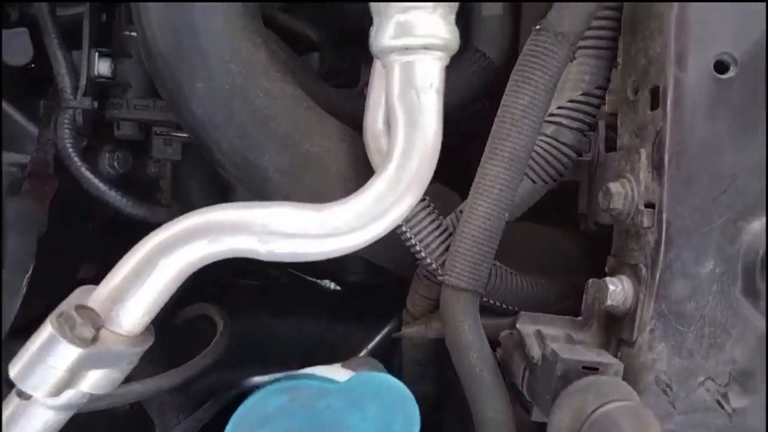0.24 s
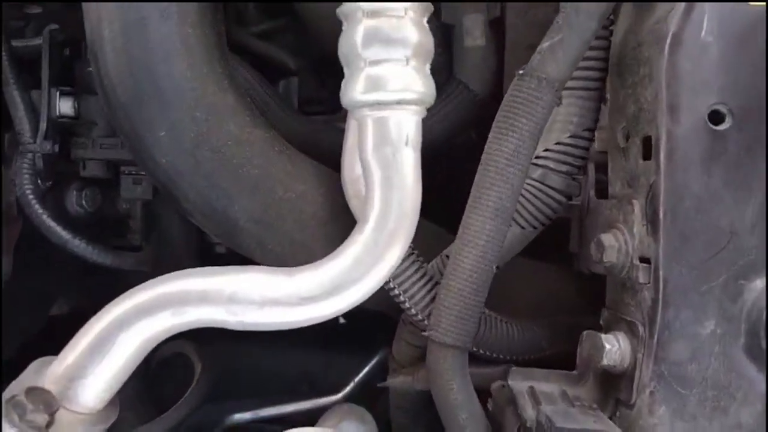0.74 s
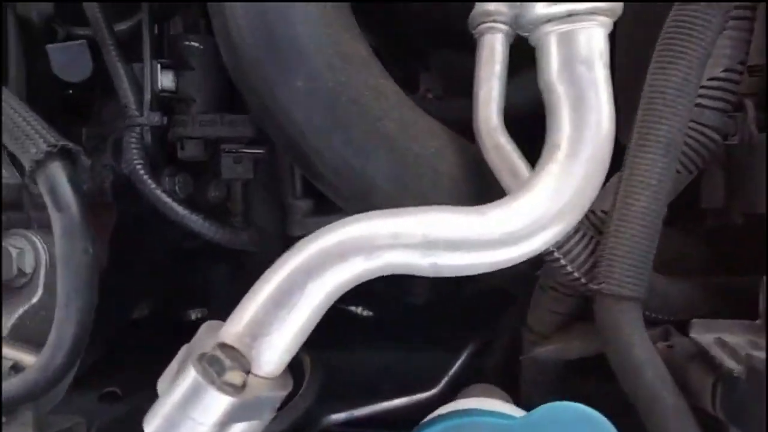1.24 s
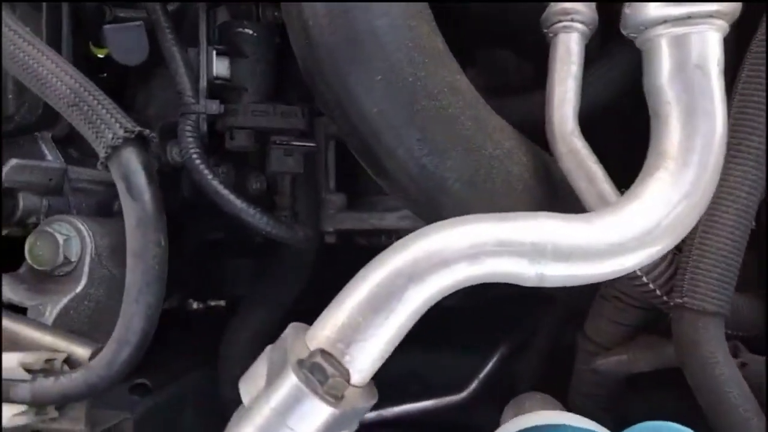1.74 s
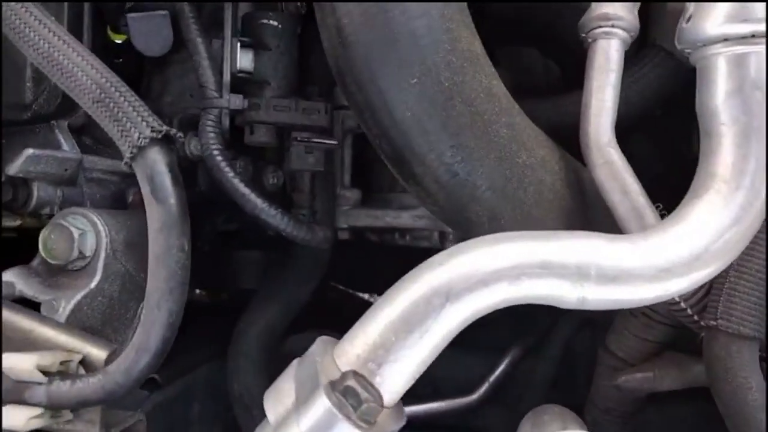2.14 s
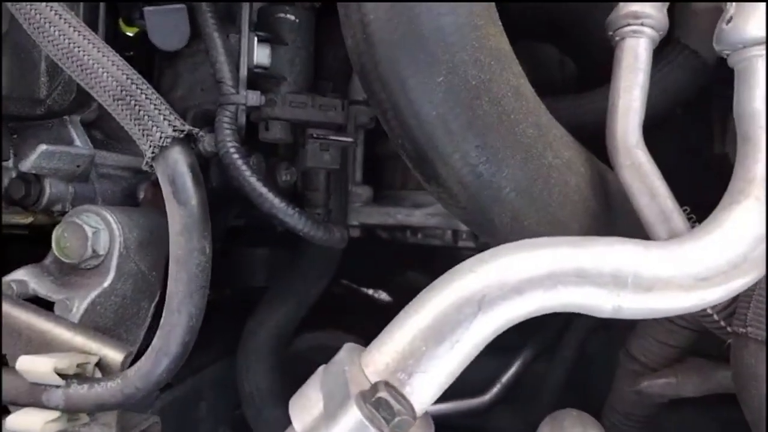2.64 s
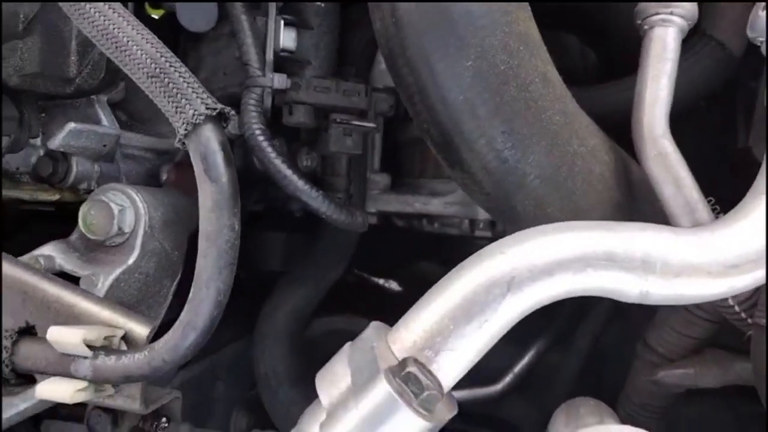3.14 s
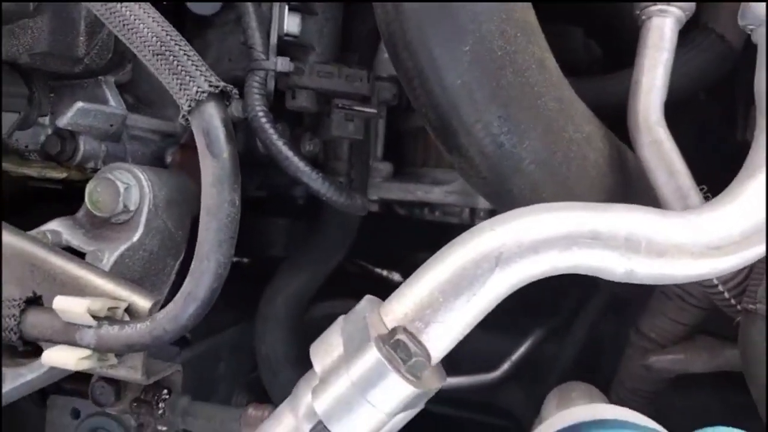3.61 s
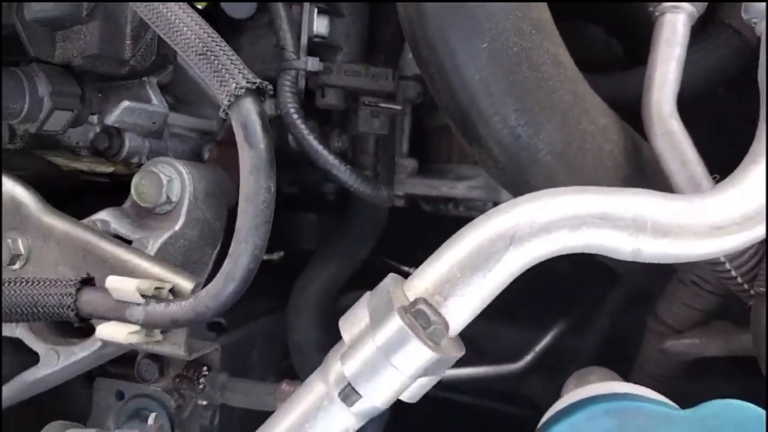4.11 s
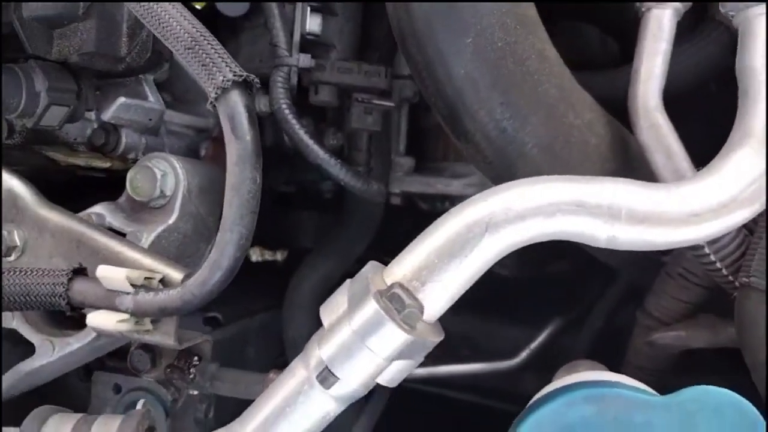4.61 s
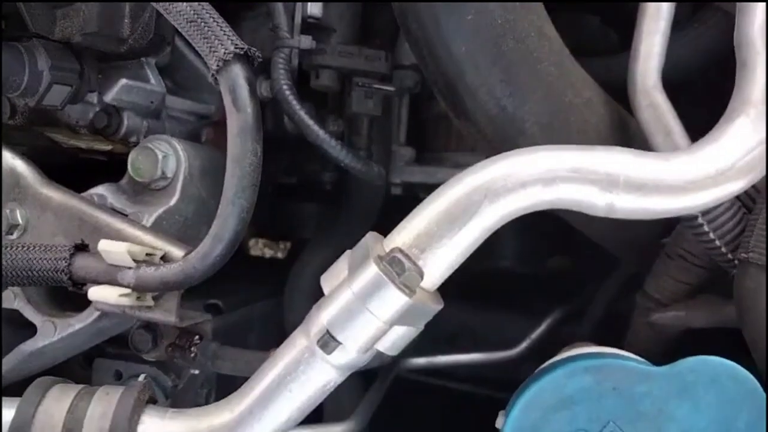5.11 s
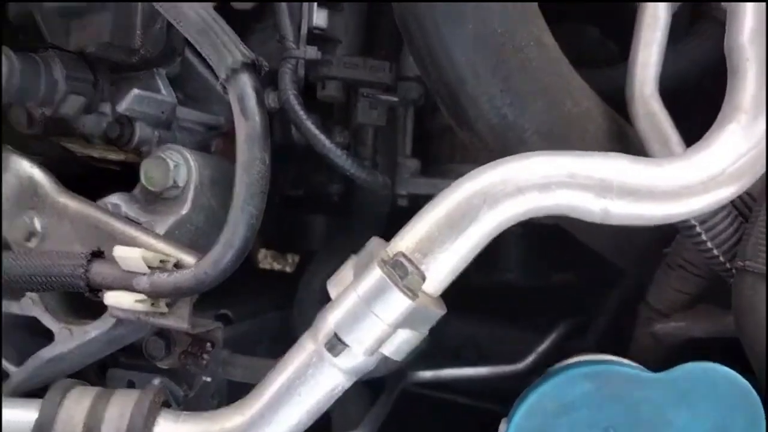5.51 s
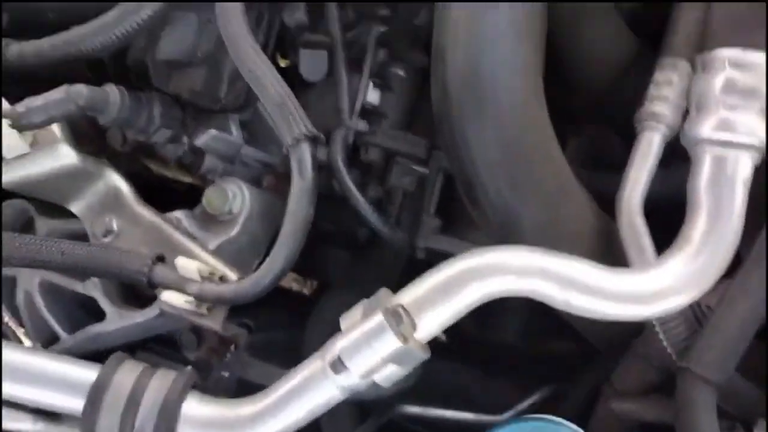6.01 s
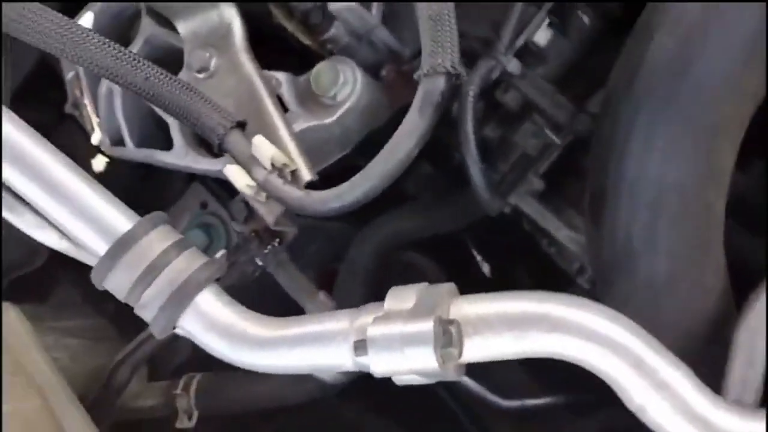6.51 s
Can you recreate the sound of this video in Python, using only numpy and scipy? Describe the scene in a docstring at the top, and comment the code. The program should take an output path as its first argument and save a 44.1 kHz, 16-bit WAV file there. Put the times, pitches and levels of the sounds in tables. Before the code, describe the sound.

From 0 to about 6.75 seconds, a four-cylinder diesel idles without changing speed, about 28 firings a second: low throb, dull metallic knocks, injector ticks and dry rattling in a pattern repeating seven times a second. Air noise, faint whine and steady belt hiss surround it. Louder on top, a slipping belt squeals from the start in rough chirps around 5 to 6 kHz, mostly around a hundredth of a second long, bright and scraping, clustering irregularly. A piercing whistle near 14.5 kHz warbles above, weaker around 0.7, stronger from 1.5, with flares near 2.6, 2.8, 4.1 and 5.7, strongest at 5.8. Brief dips in level come throughout, deeper near 3.1, 5.4 and 5.7. From about 4 a low hum near 50 Hz creeps in, growing strongest at the end and beating with the throb. The close moving microphone catches only tight, very short reflections; the sound stops mid-idle.

```python
"""An open engine bay, heard from close above: a four-cylinder diesel idles with firing throb, knocks and injector ticks.
Throb is a harmonic series; blows ring resonances and shake loose parts; moving air and belt rub are coloured noise.
The drive belt slips on a worn pulley: a very high friction whistle warbles with belt tension and flares up, and
short lower chirps break out where a slick stretch of belt meets a tug of the crank. Nearby panels reflect the squeal;
later a low sine hum joins and beats with the throb's second harmonic. Now and then the level dips."""
import sys
import numpy as np
from scipy import signal
from scipy.fft import rfft, irfft, next_fast_len
from scipy.io import wavfile
from scipy.ndimage import map_coordinates

SR = 44100
rng = np.random.default_rng(int(sys.argv[2]) if len(sys.argv) > 2 else 0)


def int16_out(signal):
    """Quantize to a 16-bit WAV file."""
    q = np.round(np.clip(np.atleast_2d(signal).T, -1, 1) * 32767)
    wavfile.write(sys.argv[1], SR, q.astype(np.int16))


N = 297675

CYCLE_HZ, CYCLE_START_S = 7.07926, .0086  # one cycle is two crank turns and four firings
BELT_HZ = 4.145  # belt laps a second
PULLEY_HZ, PULLEY_START_S = 65.52, .0023  # pulley turns a second; first tight moment
TOP_HZ = 15800  # nothing is heard above this
WHINE_RISE_DB = 2.5  # growth of the whine from first to last moment as the microphone nears the engine
WHISTLE_HZ, CHIRP_HZ = 14470, 5500  # the two friction tones before any shift
SLIP_DB, SLIP_TOP_DB = -40.5, -22.5  # an ordinary slip at mean grip, and where it saturates; before the chirp gain
CATCH_S, LET_GO_S = 0.001677, 0.002186  # a distinct slip catches at once and lets go a little more slowly
FADE_DB_PER_S = 68  # a distinct slip weakens while it lasts
SAG_SLIP_DB, SAG_HZ = -18, 400  # a slip of this strength makes the whistle sag by this much
CHOKE_DB_PER_HZ = .007  # a tighter belt whistles higher and more faintly; per Hz of tension shift
FLARE_S, FLARE_DB = 0.0024, -12  # time to the crest of a flare; gain on its listed level
DIP_FALL_S, DIP_RECOVER_S = 0.013, 0.04  # how fast a dip in level sets in and passes

# Coarse air and part noise. Each row: frequency in Hz, relative density in dB per Hz.
WASH_SPECTRUM = [(12, -3), (22, -20), (65, -2.5), (100, -8), (200, -9.5), (380, -15), (540, -9.5),
                 (720, -9.5), (980, -13), (2050, -16), (2250, -19.5), (2600, -18.5), (3400, -17),
                 (4400, -24), (7000, -55)]
# Late low hum. Each row: time in seconds, frequency in Hz, rms level in dB before the final colour and dips.
HUM_COURSE = [(3.8, 50.8, -80), (4.2, 51, -62), (4.6, 50.23, -56), (5.3, 49, -49), (6, 48.5, -47),
              (6.75, 46.3, -34.5)]
# Steady tones of gears and accessories. Each row: frequency in Hz, rms level in dB before its slow rise and waver.
WHINE_TONES = [(297.5, -67), (311.5, -60), (622.7, -51), (686.8, -57), (877.8, -49), (906, -52.5)]
# Exhaust and block throb. Each row: multiple of the firing rate, relative level in dB.
THROB_HARMONICS = [(1, -1.5), (2, 4), (3, -7), (4, -11), (5, -8), (6, -15.5), (7, -18.5), (8, -19.5)]
# Blows in every engine cycle. Each row: fraction of the cycle, then relative levels in dB of
# block knock, injector tick and rattle.
CYCLE_BLOWS = [(.035, -16, -1, 5), (.091, -4, -8, -2.5), (.18, -2, -26, -6), (.299, 1, 4.5, 7),
               (.332, 4.5, -4, -18), (0.406, -5, -25, 2), (0.546, -14, -1.5, 4.5), (0.607, -15, -13, 0.5),
               (.708, -1, -37, 1.5), (.792, -26, 2, 5), (.825, -3, 2.5, -5), (.912, -6.5, -6, -12)]
# Ringing of the block. Each row: frequency in Hz, width in Hz, relative level in dB.
BLOCK_MODES = [(534, 22, 3.5), (666, 23, -20), (675, 21, 10.5), (727, 13, 3), (880, 46, -10)]
# Ringing of the injectors. Each row: frequency in Hz, width in Hz, relative level in dB.
INJECTOR_MODES = [(1458, 87, 1), (1643, 51, 8.7), (2037, 89, 7.2)]
# The casing passes the middle range of the block, and the injectors above it.
# Each row: frequency in Hz, relative gain in dB.
BLOCK_CASING = [(250, -27), (520, 8.0), (900, 4.5), (1500, -13)]
INJECTOR_CASING = [(900, -29), (1400, 10.5), (2100, 6.0), (2300, -22)]
# Loose parts shaken by the blows. Each row: frequency in Hz, relative density in dB per Hz.
RATTLE_SPECTRUM = [(150, -28), (300, -2), (420, -14), (680, 3), (800, 1.5), (1000, -2.5), (1130, 3.5),
                   (1250, -10), (1700, 3.5), (2080, -15), (2220, -9.5), (2600, -12.5), (3400, -3),
                   (4300, -6.5), (6000, -35)]
# Loudness of the running engine as the microphone moves. Each row: time in seconds, gain in dB.
ENGINE_LEVEL = [(0, -35), (1, -35), (2.2, -34.5), (3.4, -34), (5, -34.3), (6.75, -35)]
# Rubbing of the belt over the pulleys. Each row: frequency in Hz, relative density in dB per Hz.
HISS_SPECTRUM = [(3000, -35), (4300, -7.5), (5500, -6), (6500, -4), (7400, 5), (8200, 3.5), (8800, 3.5),
                 (9250, 4), (10000, -4.5), (12500, -6), (13700, 1), (15400, 1), (15700, -35)]
# Uneven grip over one lap of the belt. Each row: fraction of a lap, tension shift in Hz (before the
# whistle scales it), slip change in dB, chirp shift in Hz.
BELT_GRIP = [(0.04, 380.0, -26, 230.5), (0.11, -1, -1.5, -190.0), (0.17, 40.5, 6, 130.5),
             (0.21, -270.0, 10.5, -130.0), (0.27, -330.0, 12, 159), (0.34, -130.0, 8, -150.0),
             (0.43, 170.5, 12.5, 10.0), (0.49, 421, -9.5, 249.5), (0.54, 261, -2.5, 80.0),
             (0.59, -460.0, 15.5, -50.5), (0.66, -80.0, -39, 160.0), (0.71, 80.0, 8, -250.0),
             (0.75, -220.0, 5.5, -500.0), (0.81, 350.5, -2.5, 91.5), (0.86, 120.0, 6.5, 59.5),
             (0.95, -320.0, -2.5, 98.5)]
# Pull of the crank over one turn, two firings. Each row: fraction of a turn, tension shift in Hz (before
# the whistle scales it), slip change in dB, chirp shift in Hz.
CRANK_PULL = [(0.0, 298, 6.5, 381), (0.15, 229.5, -0.5, 122.5), (0.3, -210.0, -24, 38.5),
              (0.38, -90.0, -9.5, -150.0), (0.47, -110.0, 22.5, 0.0), (0.57, 62, 5, -39.5),
              (0.68, -68.5, 3, -190.0), (0.76, -250.0, -8.5, -170.0), (0.87, 128.5, -14, -0.5)]
# Swing of a pulley running out of true: tension shift in Hz (before scaling), slip in dB, chirp in Hz.
PULLEY_RUNOUT = (140, -6.5, 37.4)
# Single distinct slips of the belt, strong or unusual in pitch. Each row: start in seconds, level in dB before
# the chirp gain, mean pitch in Hz before its jitter, length in seconds, level of the upper partials in dB
# before their own gains.
DISTINCT_SLIPS = [(0.178, -19.5, 4900, 0.009, 1), (0.321, -23, 5200.0, 0.01585, -2.5),
                  (0.407, -23.5, 5030.0, 0.0072, -7), (0.465, -22.5, 5400, 0.00795, 1.5),
                  (0.54, -19.5, 5340, 0.0084, -4), (0.619, -23, 5050, 0.00808, -7),
                  (0.788, -20, 5660, 0.0081, -2.5), (0.816, -19, 5440, 0.01725, -2),
                  (0.862, -22.5, 5390, 0.00698, 2), (0.894, -20, 5240, 0.009, -2.5),
                  (1.028, -19, 5710, 0.00973, -5), (1.061, -21, 5700, 0.0081, -4),
                  (1.29, -23, 5110, 0.00717, -1), (1.303, -20.5, 5350, 0.0138, -2),
                  (1.347, -22, 6110, 0.00695, -12), (1.379, -19, 4980, 0.01093, 2.5),
                  (1.528, -23, 5290.0, 0.0141, 1), (1.748, -18.5, 5150, 0.0069, 0),
                  (1.872, -23, 5070, 0.0073, 3.5), (2.02, -17.5, 5370, 0.01526, -2),
                  (2.098, -22.5, 4930, 0.00873, -3.5), (2.264, -20.5, 5920, 0.00774, -1),
                  (2.478, -22.5, 5990, 0.00994, -11), (2.51, -19.5, 5310.0, 0.0119, 3),
                  (2.547, -21.5, 5960.0, 0.00803, -5), (2.586, -20.5, 4990.0, 0.0129, 1.5),
                  (2.615, -20.5, 5800, 0.009, -8), (2.721, -21, 5290, 0.0224, -0.5),
                  (2.752, -24, 5780.0, 0.00796, 5.5), (2.791, -23, 5800, 0.01, 1),
                  (2.938, -20.5, 5410, 0.012, 0.5), (3.071, -21, 5040, 0.0088, 6),
                  (3.229, -21, 5280, 0.0096, -1.5), (3.301, -29, 4950, 0.0116, 1.5),
                  (3.578, -20.5, 5550, 0.0078, -5), (3.712, -21.5, 5530, 0.015, 2.5),
                  (3.761, -22.5, 5720, 0.0061, 1), (3.792, -21.5, 4710, 0.0087, -4),
                  (3.85, -17.5, 5770, 0.0063, -4.5), (3.921, -21.5, 5690, 0.01297, 0.5),
                  (3.958, -16.5, 5820, 0.006, -5), (4.065, -19.5, 5490, 0.01026, -1),
                  (4.144, -21.5, 5440, 0.0094, -6), (4.206, -17, 5540.0, 0.0076, 0.5),
                  (4.281, -19, 5070, 0.009, -1), (4.418, -17.5, 5460.0, 0.0088, -3.5),
                  (4.523, -21.5, 5540, 0.009, 0), (4.63, -20, 5405, 0.0131, 0),
                  (4.768, -20, 5490.0, 0.0078, -1), (4.92, -18, 5340, 0.0121, -4.5),
                  (4.995, -24, 5150, 0.0081, -3.5), (5.055, -24.5, 6070, 0.00697, -2),
                  (5.12, -19.5, 5610, 0.0181, -3.5), (5.195, -19.5, 5480, 0.016, -5),
                  (5.27, -18, 5510, 0.0111, -7), (5.334, -23.5, 5310, 0.0103, -1.5),
                  (5.369, -23.5, 5880, 0.0056, -2), (5.407, -15.5, 5540, 0.00685, -2),
                  (5.475, -21.5, 5170, 0.0157, -1), (5.624, -22, 5070, 0.0111, -2),
                  (5.653, -20.5, 6000, 0.006, -6), (5.971, -20, 5420.0, 0.01026, -2),
                  (6.11, -20, 5390, 0.0091, -1), (6.325, -19, 5540, 0.0173, -4.5),
                  (6.536, -25, 5210, 0.0079, 4), (6.572, -25, 5820, 0.0093, 3.5),
                  (6.613, -18, 5470.0, 0.009, 0), (6.674, -20.5, 5100, 0.0146, -2.5)]
# Loudness of the belt whistle. Each row: time in seconds, relative level in dB.
WHISTLE_LEVEL = [(0, -23.5), (0.7, -29), (1.1, -26), (1.55, -21), (2.1, -20.5), (2.9, -21.5), (3.3, -21.5),
                 (4.3, -21), (4.7, -22.2), (5.3, -24.5), (5.85, -15), (6, -25.5), (6.45, -23.5),
                 (6.75, -27.1)]
# Moments when the whistle flares up. Each row: start in seconds, level in dB before the flare gain.
WHISTLE_FLARES = [(0.4489, -13), (1.2261, -11), (1.5803, -12), (2.144, -13), (2.6364, -8), (2.7821, -5),
                  (2.9208, -12), (3.0275, -10), (3.2725, -14), (3.9818, -14), (4.122, -5), (4.4763, -15),
                  (5.5315, -23), (5.669, -8.5), (5.7876, 3), (6.1724, -12)]
# Scraping of the belt during a slip. Each row: frequency in Hz, relative density in dB per Hz.
SCRAPE_SPECTRUM = [(3000, -21.5), (4500, -8), (6500, -0.5), (8000, 1), (10000, 3), (12500, 0), (14000, -2),
                   (15500, -8)]
# Colour of the squeal on its way out of the bay. Each row: frequency in Hz, gain in dB.
SQUEAL_COLOUR = [(4000, 6), (4750, 3), (5400, 0), (5700, -0.5), (6100, 4.5), (6700, 1.5), (7600, 5.5),
                 (8800, -2.5), (9250, 3), (9700, 4), (10300, 2), (12400, -5), (13400, -1.5), (15400, 9),
                 (15650, -20)]
# Change of colour from first to last moment, as the microphone moves toward the engine.
# Each row: frequency in Hz, change in dB.
APPROACH_COLOUR = [(70.0, 0.5), (340.0, 0.5), (580.0, 0.9), (950.0, 0), (1490.0, 1), (2150.0, 0),
                   (3080.0, 0), (5630.0, 0.8), (7360.0, -1.3), (9060.0, 2.5), (11400.0, -1)]
# Brief dips of the whole level. Each row: start of the hold in seconds, depth in dB, hold in seconds.
LEVEL_DIPS = [(0.21, -3.2, 0.029), (0.478, -1.5, 0.063), (1.112, -2.5, 0.05), (1.386, -4.5, 0.063),
              (1.751, -5, 0.065), (2.16, -3.5, 0.094), (2.308, -3, 0.063), (2.512, -2.4, 0.12),
              (2.95, -3, 0.051), (3.074, -5.5, 0.063), (3.454, -3, 0.071), (3.831, -2.5, 0.1),
              (4.199, -3, 0.12), (4.64, -2, 0.1), (5.141, -1.5, 0.066), (5.408, -5.0, 0.066),
              (5.696, -6.5, 0.076), (5.813, -2.5, 0.15), (6.328, -2, 0.089), (6.618, -2.5, 0.12)]


def amp(db):
    """Level to amplitude: twenty decibels are a factor of ten."""
    return 10 ** (np.asarray(db) / 20)


def unit(x):
    """Normalisation to an rms of 1."""
    return x / np.sqrt(np.mean(x ** 2) + 1e-20)


def clock():
    """Time of every sample in seconds."""
    return np.arange(N) / SR


def cycles():
    """Phase of the engine, in cycles."""
    return CYCLE_HZ * (clock() - CYCLE_START_S)


def curves(rows):
    """Linear interpolation in time of each column after the first."""
    s, *columns = np.transpose(rows)
    return [np.interp(clock(), s, column) for column in columns]


def around(rows, turns):
    """Periodic interpolation: a rotating part repeats its table once a turn."""
    place, *columns = np.transpose(rows)
    return [np.interp(turns, place, column, period=1) for column in columns]


def wobble(rate):
    """Smooth random modulation: a spline through normal deviates, rate knots a second."""
    knots = rng.standard_normal(int(N * rate / SR) + 4)
    return map_coordinates(knots, [clock() * rate])


def filtered(x, response):
    """Linear filtering: the spectrum is multiplied by a response of frequency."""
    m = next_fast_len(N + SR // 2)
    return irfft(rfft(x, m) * response(np.fft.rfftfreq(m, 1 / SR)), m)[:N]


def coloured(x, points):
    """Spectral shaping, with gain in dB interpolated over log frequency."""
    f, db = np.transpose(points)
    return filtered(x, lambda hz: amp(np.interp(np.log(hz + 1), np.log(f), db)))


def resonate(x, modes):
    """Modal superposition: each mode is a damped second-order resonance."""
    def response(f):
        return sum(amp(db) * 1j * f * width / (centre ** 2 - f * f + 1j * f * width)
                   for centre, width, db in modes)
    return filtered(x, response)


def wash():
    """Broadband noise of moving air and parts: white noise shaped by a spectrum."""
    return unit(coloured(rng.standard_normal(N), WASH_SPECTRUM))


def hum():
    """Interference: a low sine just under twice the firing rate beats with the throb's second harmonic."""
    hz, db = curves(HUM_COURSE)
    return np.sqrt(2) * amp(db) * np.sin(2 * np.pi * np.cumsum(hz) / SR)


def whine():
    """Steady rotation radiates pure tones, here wavering slightly in level and phase."""
    total = np.zeros(N)
    for hz, db in WHINE_TONES:
        tone = np.sin(2 * np.pi * hz * clock() + 0.19 * wobble(3.01))
        total += np.sqrt(2) * amp(db + wobble(3)) * tone
    return amp(WHINE_RISE_DB * np.linspace(-.5, .5, N)) * total


def throb():
    """Fourier synthesis: harmonics of the firing rate form one low pressure dip per firing."""
    firing = 4 * cycles() - .73
    pulse = -sum(amp(db) * np.cos(2 * np.pi * k * firing) for k, db in THROB_HARMONICS)
    return unit(pulse) * amp(.8 * wobble(8))


def blows(level_db, scatter_db, jitter_s):
    """Periodic impulsive excitation at fixed crank angles, never quite alike in size and timing."""
    count = int(CYCLE_HZ * N / SR) + 1
    fraction = np.transpose(CYCLE_BLOWS)[0]
    when = (np.arange(count)[:, None] + fraction) / CYCLE_HZ + CYCLE_START_S
    when = when + jitter_s * rng.standard_normal(when.shape)
    size = amp(level_db + scatter_db * rng.standard_normal(when.shape))
    samples = np.abs(when.ravel() * SR).astype(int)
    return np.bincount(samples, size.ravel(), N)[:N]


def rattling(hits, spread_s, alike):
    """Contact noise: blows briefly shake loose parts, a share of whose contacts recurs every cycle."""
    t = np.linspace(-1 / 20, 1 / 20, SR // 10)
    shake = np.exp(-((t - spread_s / 2) / spread_s) ** 2)
    force = signal.fftconvolve(hits, shake, "same")
    repeating = np.resize(rng.standard_normal(round(SR / CYCLE_HZ)), N)
    return force * (np.sqrt(alike) * repeating + np.sqrt(1 - alike) * rng.standard_normal(N))


def clatter():
    """Impact response: blows ring the block and injectors through the casing and shake loose parts."""
    _, block_db, tick_db, rattle_db = np.transpose(CYCLE_BLOWS)
    block_blows = blows(block_db, scatter_db=1.0, jitter_s=0.00019)
    knock = coloured(resonate(block_blows, BLOCK_MODES), BLOCK_CASING)
    injector_blows = blows(tick_db, scatter_db=1.0, jitter_s=0.00037)
    tick = coloured(resonate(injector_blows, INJECTOR_MODES), INJECTOR_CASING)
    rattle_blows = blows(rattle_db, scatter_db=3.0, jitter_s=0.00042)
    rattle = coloured(rattling(rattle_blows, spread_s=0.0057, alike=0.65), RATTLE_SPECTRUM)
    return amp(-8.5) * unit(knock) + amp(-12) * unit(tick) + amp(-6.0) * unit(rattle)


def engine():
    """Superposition of wash, throb and clatter under one level, with the whine added."""
    engine_db, = curves(ENGINE_LEVEL)
    body = clatter() + amp(-2.0) * throb() + amp(-3.0) * wash()
    return amp(engine_db) * body + whine()


def belt_hiss():
    """Sliding friction noise: the belt always rubs over the pulleys, a little harder at each firing."""
    engine_db, = curves(ENGINE_LEVEL)
    pulsing_db = 2.0 * np.cos(2 * np.pi * (4 * cycles() - .35)) + 1.8 * wobble(60)
    rub = unit(coloured(rng.standard_normal(N), HISS_SPECTRUM))
    return amp(engine_db + pulsing_db + 1.66) * rub


def tension():
    """Belt lap, crank turn and pulley runout add up to tension shift, slip and chirp shift."""
    runout = np.cos(2 * np.pi * PULLEY_HZ * (clock() - PULLEY_START_S))
    belt = around(BELT_GRIP, BELT_HZ * clock())
    crank = around(CRANK_PULL, 2 * cycles())
    return np.add(belt, crank) + np.outer(PULLEY_RUNOUT, runout)


def slips(slip_db, shift_hz):
    """Stick-slip: grip and tug set saturating chirp strength, pitch and brightness; distinct slips override."""
    urge = amp(SLIP_DB + slip_db + 2.83 * wobble(60))
    strength = urge / np.hypot(1, urge / amp(SLIP_TOP_DB))
    pitch = CHIRP_HZ + shift_hz + 110 * wobble(90)
    bright_db = 3.95 * wobble(50)
    t = clock()
    for s, db, hz, length, upper_db in DISTINCT_SLIPS:
        near = slice(max(0, int(s * SR) - SR // 50), int(s * SR) + SR // 15)
        since = t[near] - s
        before, after = np.minimum(since, 0), np.maximum(since - length, 0)
        hold = np.exp(-(before / CATCH_S) ** 2 - (after / LET_GO_S) ** 2)
        fading = amp(db - FADE_DB_PER_S * (since - length / 2))
        strength[near] += hold * (fading - strength[near])
        # the mean pitch moves to hz; its wobble is kept
        pitch[near] += np.sqrt(hold) * (hz - np.average(pitch[near], weights=hold))
        bright_db[near] += hold * (upper_db - bright_db[near])
    return strength, pitch, bright_db


def flares():
    """Transient growth and decay: extra strength of the whistle in its brief flares."""
    t = np.arange(SR // 20) / SR / FLARE_S
    shape = (t * np.exp(1 - t)) ** 2
    strength = np.zeros(N + SR)
    for s, db in WHISTLE_FLARES:
        strength[max(0, int(s * SR)):][:len(t)] += amp(db + FLARE_DB) * shape
    return strength[:N]


def rough(phase):
    """Irregular friction: a partial that flutters in level and jitters in phase by itself."""
    return (1 + .3 * wobble(350)) * np.sin(phase + .26 * wobble(1200))


def squeal():
    """Two friction oscillations of belt and pulley; the shared contact mixes them into a difference tone."""
    level_db, = curves(WHISTLE_LEVEL)
    tight_hz, slip_db, shift_hz = tension()
    slip, chirp_hz, bright_db = slips(slip_db, shift_hz)
    sag = slip / amp(SAG_SLIP_DB)
    # the whistle follows the tension, trembles, and sags in pitch while the belt chirps
    tremble_hz = 150 * wobble(120) + 70 * wobble(350)
    whistle_hz = WHISTLE_HZ + 1.2 * tight_hz + tremble_hz - SAG_HZ * (sag - sag.mean())
    high = 2 * np.pi * np.cumsum(whistle_hz) / SR
    flutter = np.clip(1 + 0.82 * wobble(330), 0, 2)
    tone = unit(flutter * np.sin(high + 0.22 * wobble(1700)))
    swing = unit(amp(-CHOKE_DB_PER_HZ * tight_hz + 2.0 * wobble(35)))
    whistle = (amp(level_db - 4.5) * swing + flares()) * tone
    # the chirp is rough: its pitch jitters under all its partials
    low = 2 * np.pi * np.cumsum(chirp_hz + 100 * wobble(500)) / SR
    difference = amp(-0.07) * rough(high - low)
    octave = amp(-6.5) * rough(2 * low)
    scrape = amp(-11.0) * unit(coloured(rng.standard_normal(N), SCRAPE_SPECTRUM))
    upper = amp(bright_db) * (difference + octave + scrape)
    chirps = amp(2.5) * slip * (rough(low) + upper)
    return coloured(whistle + chirps, SQUEAL_COLOUR)


def bay(x, t60_s, wet_db):
    """Reverberation: close panels and hoses return a dense, very short echo that changes as the microphone moves."""
    t = clock()[:SR // 8]
    stops = np.linspace(0, N / SR, round(2 * N / SR))
    echo = np.zeros(N)
    for s in stops:
        tail = rng.standard_normal(len(t)) * amp(-60 * t / t60_s) * (1 - np.exp(-t / 0.0004))
        # equal-power crossfade between neighbouring stops
        nearness = np.sqrt(np.maximum(0, 1 - np.abs(clock() - s) / stops[1]))
        echo += signal.oaconvolve(x * nearness, tail / np.linalg.norm(tail))[:N]
    return (x + amp(wet_db) * echo) / np.sqrt(1 + amp(wet_db) ** 2)


def approach(x):
    """Position-dependent colour: the moving microphone passes evenly from one colour to the other."""
    hz, db = np.transpose(APPROACH_COLOUR)
    first = coloured(x, np.c_[hz, -db / 2])
    last = coloured(x, np.c_[hz, db / 2])
    return first + (last - first) * np.linspace(0, 1, N)


def dips():
    """Amplitude modulation: each brief dip in level has a quick fall, a hold and a recovery."""
    total_db = np.zeros(N)
    for s, db, hold in LEVEL_DIPS:
        corners = [s - DIP_FALL_S, s, s + hold, s + hold + DIP_RECOVER_S]
        total_db += np.interp(clock(), corners, [0, db, db, 0])
    return amp(total_db)


def scene():
    """Superposition of engine and belt at one moving microphone."""
    belt = belt_hiss() + bay(squeal(), t60_s=0.041, wet_db=-5.5)
    return approach(engine() + hum() + belt)[None]


def record(dry):
    """Band limitation: the level dips now and then, and nothing remains above the top frequency."""
    gain = dips()
    return np.array([filtered(channel * gain, lambda hz: hz < TOP_HZ) for channel in dry])


dry = scene()
out = record(dry)
int16_out(out)
```